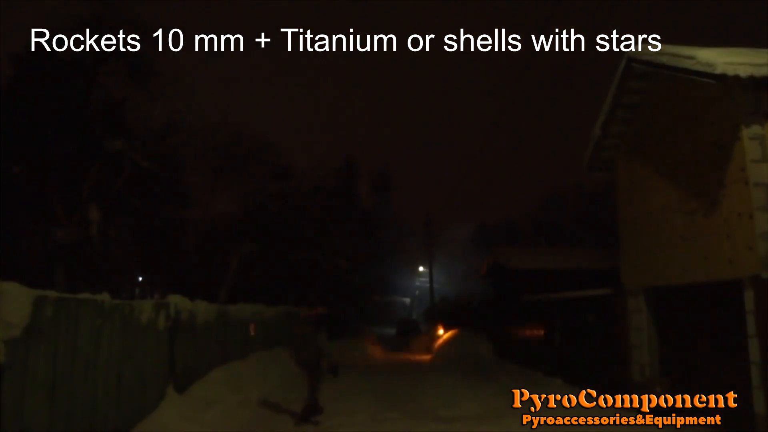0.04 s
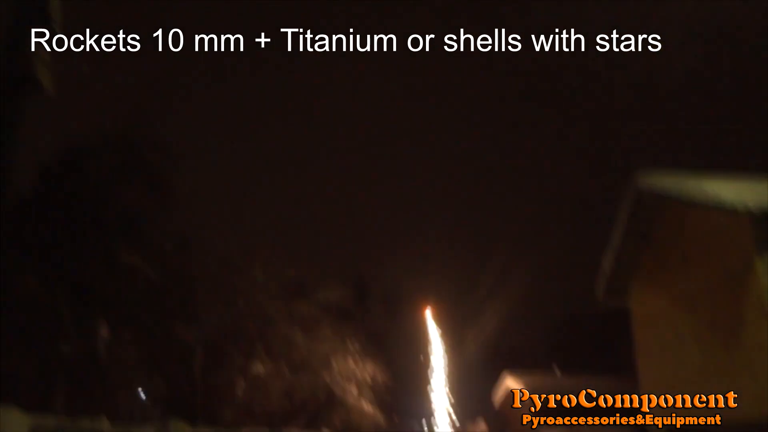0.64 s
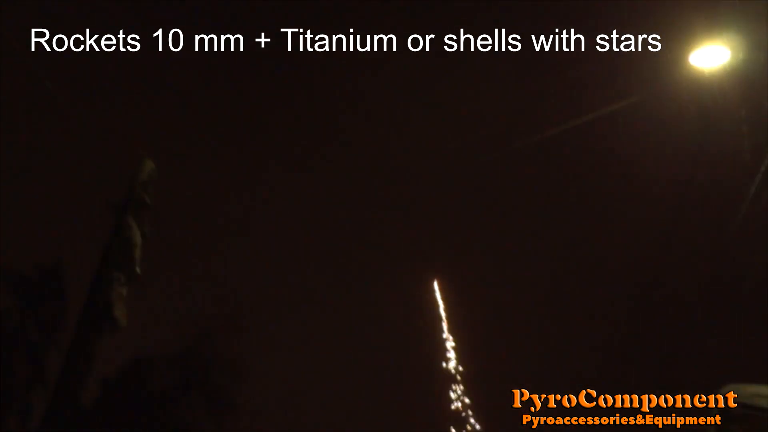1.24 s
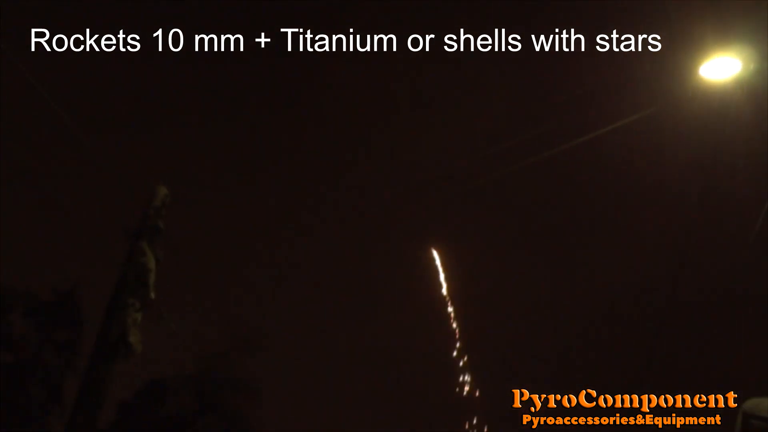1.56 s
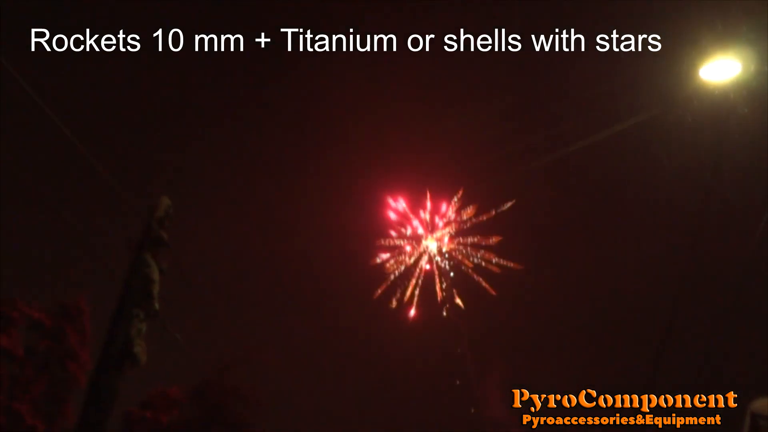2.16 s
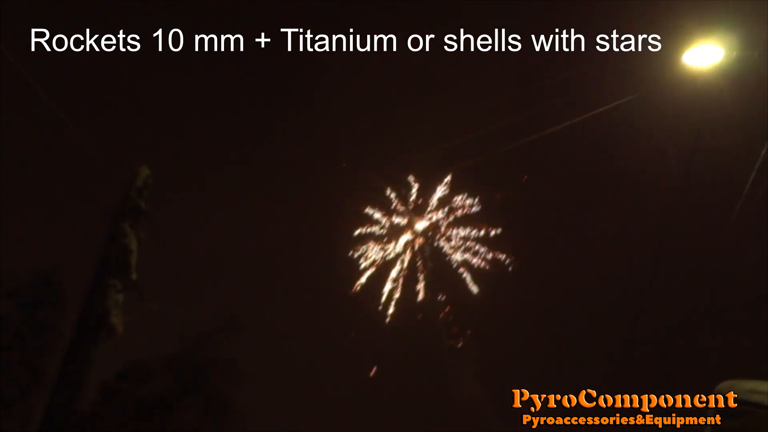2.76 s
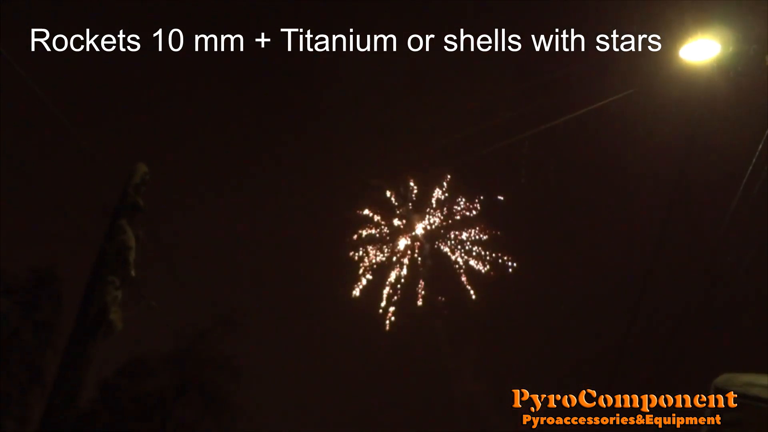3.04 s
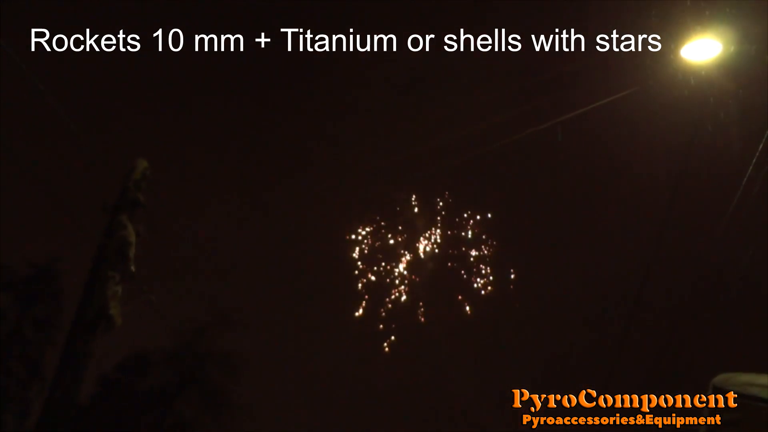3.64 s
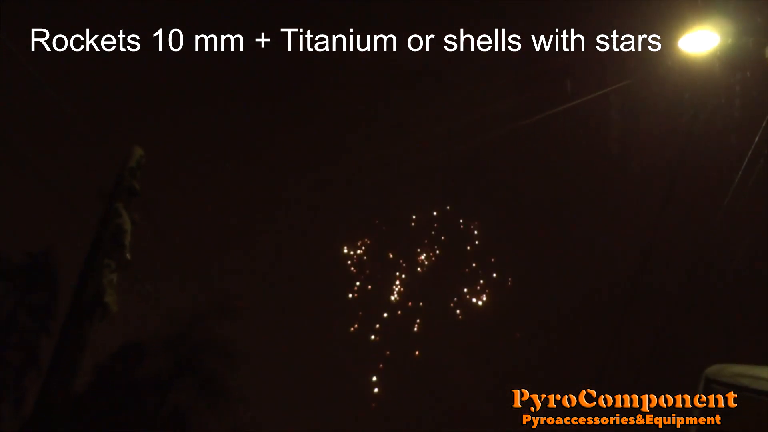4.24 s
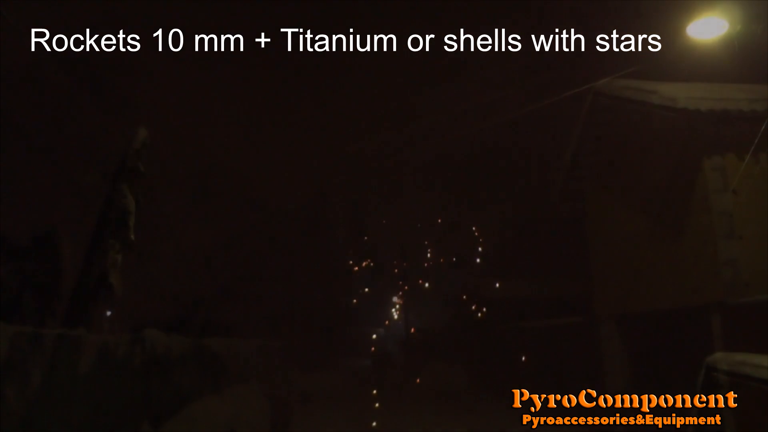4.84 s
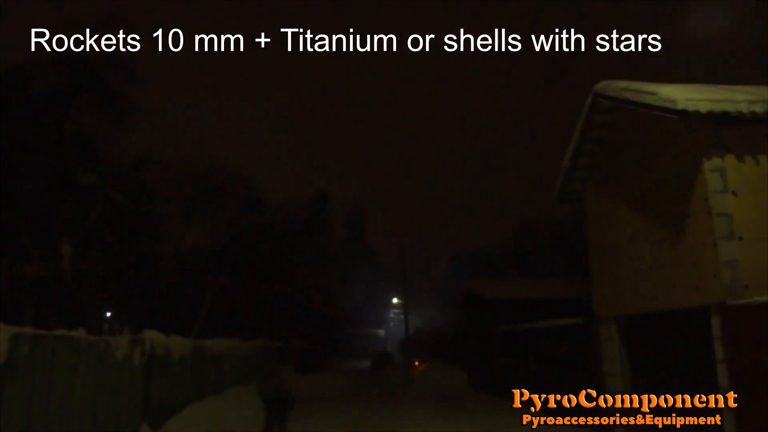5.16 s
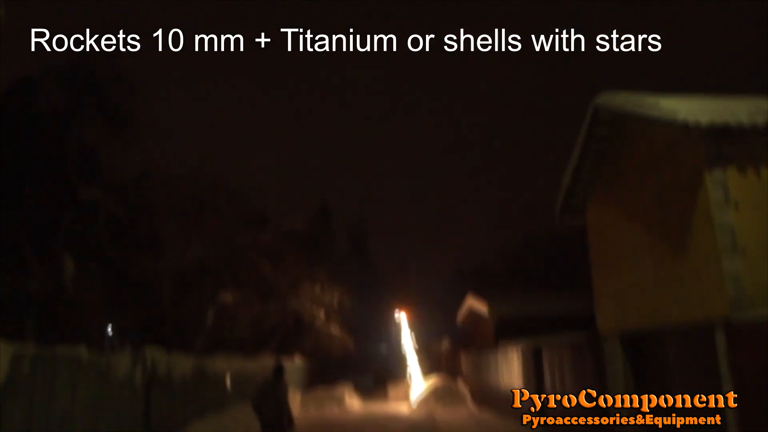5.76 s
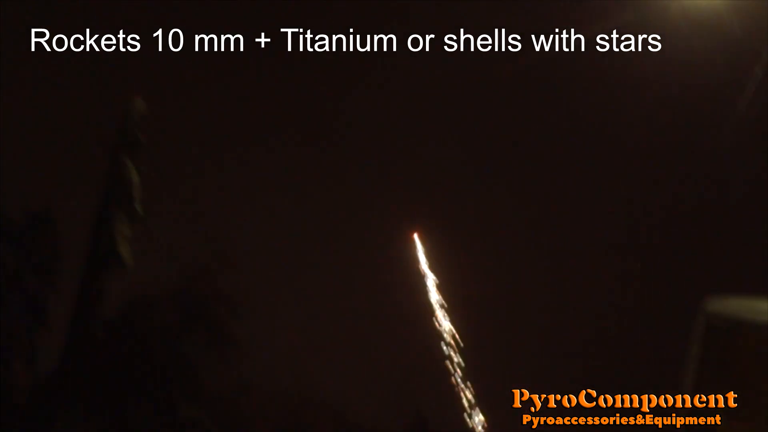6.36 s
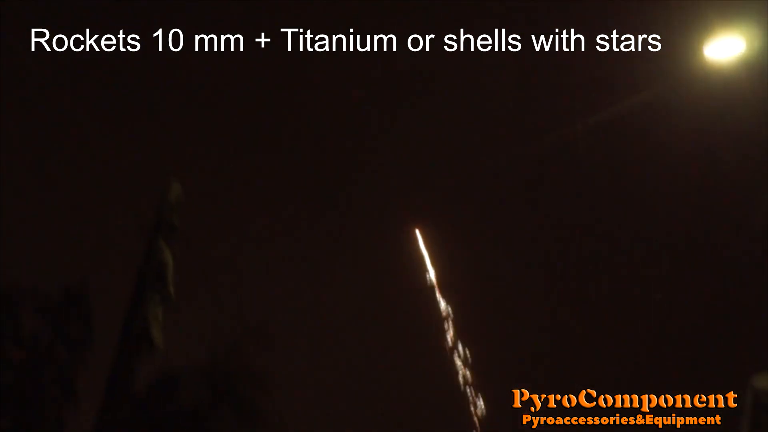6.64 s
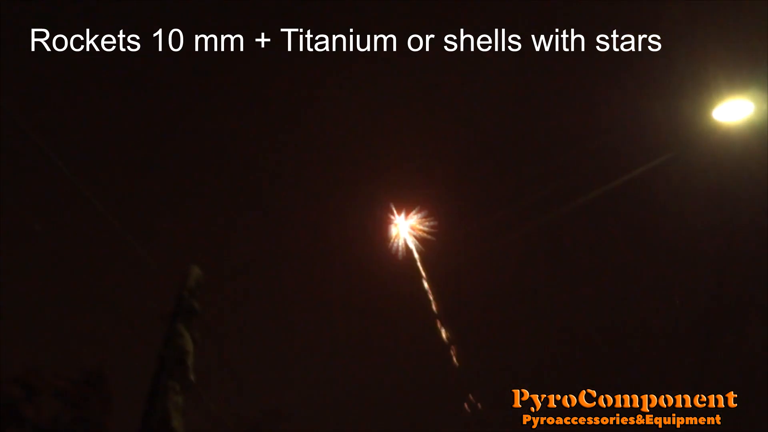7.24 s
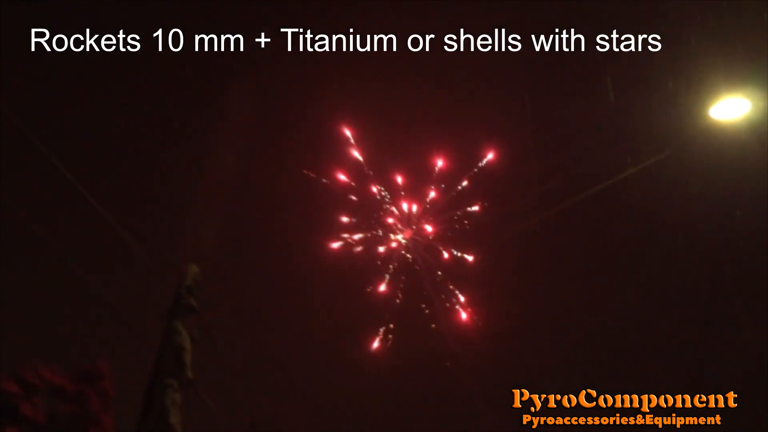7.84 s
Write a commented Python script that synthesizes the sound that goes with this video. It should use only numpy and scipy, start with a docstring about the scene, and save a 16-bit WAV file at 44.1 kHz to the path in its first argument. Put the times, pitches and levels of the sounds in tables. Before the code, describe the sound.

A firework rocket launches right at the start with a thump and a brief fizz. A rush of gas follows, with a whistle that begins ragged, slides down in pitch, grows purer and lifts slightly before ending at 1.2 seconds, leaving distant echoes. At 2 seconds it bursts with a loud, rolling boom. Sharp, irregular cracks follow from 2.5 to 3.7 seconds, then faint ticks close to the microphone around 4. A few more cracks lead to a duller, long-echoing boom at 4.5. A second fuse fizzes, and at 5.4 another thump sends up a second hissing, falling whistle, ending with a smaller bang at 6.5. This rocket bursts loudly at about 7.4 seconds, with two cracks just before 8. The fireworks sound from ahead, outdoors on a street, echoing off houses and trees over the very soft hush of night air.

```python
"""Two whistling rockets go up, one after the other, and burst over a snowy street at night.
Each lights with a fizzing fuse, a thump and a rush of gas. Its whistle slides down in pitch as the
tube burns hollow. Booms and the sharp cracks of stars (firework pellets) follow; faint ticks and
rustles sound close to the microphone. The ground, the houses and far trees throw the fireworks'
sound back, over the soft hush of still air."""
import sys
import numpy as np
from scipy import signal
from scipy.fft import rfft, irfft, next_fast_len
from scipy.io import wavfile

SR = 44100
rng = np.random.default_rng(int(sys.argv[2]) if len(sys.argv) > 2 else 0)


def generate_wav(sig):
    """Save sig (samples, or channels by samples) to the path in sys.argv[1] as 16-bit PCM at SR."""
    pcm = np.round(np.clip(np.atleast_2d(sig).T, -1, 1) * 32767).astype(np.int16)
    wavfile.write(sys.argv[1], SR, pcm)


N = 357210

# The two rockets: ignition_s, lift_off_s, flare_db, jet_db, whistle_db, roar_fade_db_per_s, attack_s
LAUNCHES = [(.05, 0.269, -34.5, -25, 0.14, 12.5, .04), (5.429, 5.56, -32, -25, 0.03, 38.5, .004)]
# Each tube's lowest note, from full thrust to burn-out: time_s, pitch_hz
FIRST_PITCH = [(.172, 2452), (.235, 2266), (.29, 2452), (.345, 2360), (.5, 1873), (.63, 1579), (.75, 1412),
               (.875, 1336), (.965, 1399), (1.07, 1355), (1.135, 1423), (1.18, 1540)]
SECOND_PITCH = [(5.51, 2520), (5.56, 2489), (5.64, 2332), (5.8, 1873), (5.96, 1535), (6.16, 1322),
                (6.24, 1320), (6.29, 1361), (6.46, 1399), (6.5, 1493)]
# Whistle tones that follow LOW_SWELL (odd) and HIGH_SWELL (even): pitch_multiple, offset_db
ODD_TONES = [(1, 0.5), (3, 0.5), (5, -12.5), (7, -11.5), (9, -22)]
HIGH_EVEN_TONES = [(6, -15.5), (8, -18), (10, -32)]
# The hiss and the roar of the gas jet, and the fizz of the fuse: frequency_hz, level_db
HISS_COLOUR = [(1200, -37.5), (2300, -4), (3200, 7), (4500, 8.5), (6000, 7.5), (7500, -2), (10000, -2),
               (13000, -10.5), (16000, -21)]
ROAR_COLOUR = [(100, -57.5), (350, -25.5), (650, -10.5), (1100, -1.5), (1800, -1.5), (2600, -4),
               (5000, -14.5), (12000, -43.5)]
FUSE_COLOUR = [(800, -9), (2000, -8.5), (2500, -13.5), (3300, -4), (4200, 2), (5000, -6), (6000, -2),
               (7500, -8.5), (10000, -14.5), (14000, -26.5), (16000, -31)]
# Notes at which the hollow tube rings: pitch_multiple, width_hz, level_db
TUBE_RINGS = [(.48, 111, -12.5), (0.669, 150, -9), (.97, 240.2, 3), (1.269, 258.2, 0), (2.021, 377.5, 4.5),
              (2.6, 497, -7), (3.07, 496, -3.5), (4, 501, -7)]
# Powder blasts on the ground and in the sky: start_s, level_db, body_hz, treble_db_per_octave,
# bounce_delay_s, echo_db, echo_swell_s, echo_length_s, midrange_bark_db, wall_slap_db
BLASTS = [ (0.0425, 3, 361, -1, 0.021, 20, 0.027, 0.18, 0.5, -6),
          (2.0225, 2, 417, 0.5, 0.0084, 21, 0.078, 1.55, -3, -2),
          (2.82, -11.5, 319, -1, 0.0073, 21, 0.063, 1.3, 0, -3),
          (4.5405, 1.5, 380, -6.5, 0.023, 19, 0.015, 2.3, 3.5, -8),
          (5.4284, 4, 320, 2.5, 0.019, 19.5, 0.024, 0.093, 0, -6),
          (6.546, -9.5, 352, -3, 0.025, 13.5, 0.0066, 0.53, 4, -3.5),
          (7.323, -11.5, 355.6, -4.5, 0.021, 18.5, 0.022, 0.31, 2, -6.5),
          (7.3741, 2.5, 425.4, 1.5, 0.0067, 20, 0.053, 2.4, -1.5, 1.5)]
# The tone of a blast: multiple_of_body_hz, level_db
BLAST_COLOUR = [(.07, -43), (.17, -29), (.31, -18.5), (.52, -2.5), (.8, 3), (1, 2), (1.3, 1), (1.8, -2),
                (2.6, -7), (5.2, -12), (9.5, -19.5), (17, -30.5), (26, -34.5), (38, -40)]
# Cracking stars: start_s, level_db, treble_db_per_octave, echo_db
STAR_CRACKS = [ (2.0676, -7.5, 11.5, 5.5), (2.4585, -7.5, 0.5, -11), (2.5376, -15.5, 5, -8),
               (2.6397, 0.5, 1, -1.5), (2.7088, -4, 3, -11), (2.8254, 1.5, -1, 1.5), (2.8977, 3, -2, 3.5),
               (3.3955, 0.5, -2.5, 2), (3.4393, 3.5, -3.5, 1.5), (3.4881, -3, -4.5, 6),
               (3.5474, 1.5, 1.5, -2), (3.6867, -17.5, -10, -12.5), (4.2939, -3.5, -2, 8.5),
               (4.3051, -6, -0.5, 9), (4.4333, -6.5, -2, 4.5), (7.7462, -12, 0, -16), (7.8638, -1.5, 2, -5)]
# Thin, high ticks: start_s, level_db, rustle_db, rustle_length_s
TICKS = [(3.9, -22, -55.5, .11), (3.909, -19, -62, .02), (3.995, -23, -58, 0.023), (4.138, -26, -56, 0.04),
         (4.578, -42, -57, .05), (5.217, -25.5, -66.5, .01)]
# The tone of a crack and of a tick: frequency_hz, level_db
CRACK_COLOUR = [(30, -41.5), (100, -27), (250, -6), (600, 2), (1200, 2.5), (2500, 1.5), (4200, -3),
                (7000, -15), (11000, -21.5), (16000, -40.5)]
TICK_COLOUR = [(1000, -32), (3500, -3), (7000, -6.5), (11500, 1), (15000, -1.5)]
# House fronts that slap a blast back: delay_s, level_db
HOUSE_FRONTS = [(0.044, -11.5), (0.079, -16.5), (.101, -16.5), (0.118, -17), (0.167, -17.5), (.176, -16),
                (.248, -22), (.318, -26), (.538, -36)]
# Whistle echoes off far walls and trees. The rocket moves away from them more slowly, so they hear
# a higher pitch (the Doppler effect): delay_s, level_db, pitch_factor, smear_s
FAR_ECHOES = [(0.149, -17, 1.055, .2), (.29, -22.5, 1.04, 0.22), (0.429, -27.5, 1.04, .16),
              (.71, -30.5, 1.02, .06), (.86, -46, 1.03, .2)]
# How long the street's echo takes to fall by 60 dB: frequency_hz, decay_s
STREET_DECAY = [(100, 3), (300, 1.5), (700, 2.5), (1500, 1.59), (3000, 1.3043), (5000, 0.84), (8000, 0.81),
                (15000, 0.5553)]
# The tone left by the walls, by a trip along the street and by a long way in air: frequency_hz, gain_db
WALL_COLOUR = [(100, -9), (400, -1), (1500, -0.5), (3500, 0), (7000, 1.5), (15000, 6.5)]
WASH_COLOUR = [(1400, -1), (3000, 3.5), (5500, 0.5), (11000, -5)]
FAR_COLOUR = [(1400, -2.5), (3000, -1.5), (4200, -15), (5600, -37), (10000, -55.5)]
# Still night air: frequency_hz, level_db
AIR_COLOUR = [(25, -8), (90, -17), (250, 1.5), (600, -3.5), (1500, -23), (4000, -33), (9000, -29),
              (13500, -28), (15000, -45)]
# How much the two microphones differ, against what they share: frequency_hz, gain_db
STEREO_WIDTH = [(60, -32), (150, -25), (500, -14.5), (1000, -6), (2500, -7), (5000, -7.5), (12000, -10.5)]
# How the sound leans to one side: frequency_hz, left_minus_right_db
STEREO_LEAN = [(130, 0), (640, -1), (1400, -2), (3100, -0.2), (7000, 0)]

# Whistle tones swell and fade in the climb: peak_db, peak_after_lift_s, rise_db_per_s, fade_db_per_s
LOW_SWELL, MAIN_SWELL, OCTAVE_SWELL = (-22, 0.53, 51, 89), (-14, 0.68, 11, 13), (-22, 0.6, 24.5, 55.5)
HIGH_SWELL = (-22, 0.66, 42, 100)  # these come out late, once the tube is long
WHISTLE_RELEASE_S = 0.028
JET_START_DB, JET_CATCH_DB, JET_CATCH_S = -25, -12, 0.01  # builds, then jumps as the whistle catches
JET_HOLD_S, JET_FADE_DB_PER_S, JET_RELEASE_S = 0.28, 43, 0.11  # holds steady at first, then fades
FUSE_S, SMOULDER_DB, SMOULDER_DB_PER_S = 0.72, -50, 27
FLARE_LEAD_S, FLARE_RISE_S, FLARE_RELEASE_S = 0.16, 0.028, 0.03


def rockets(wash_db=-17, fence_db=-12, fence_decay_s=0.016):
    """Fuse, jet and whistle, blurred by near fences, washed along the street and echoed from afar."""
    direct, far = np.zeros(N), np.zeros(N)
    for pitch, launch in zip((FIRST_PITCH, SECOND_PITCH), LAUNCHES):
        ignition_s, lift_s, flare_db, jet_db, whistle_db, roar_fade_db_per_s, attack_s = launch
        add(direct, *fuse(pitch[0][0], flare_db))
        add(direct, *jet(pitch, ignition_s, lift_s, jet_db, roar_fade_db_per_s))
        add(direct, *whistle(pitch, lift_s, whistle_db, attack_s))
        add_far_echoes(far, pitch, lift_s, whistle_db, attack_s)
    fences = rng.standard_normal(SR // 4) * np.exp(-np.arange(SR // 4) / SR / fence_decay_s)
    near = amp(fence_db) * signal.fftconvolve(direct, unit_energy(fences))[:N]
    street = street_echo(swell_s=0.02, lumpy_db=4.5, early_db=-6.5, early_s=0.37)
    wash = amp(wash_db) * signal.fftconvolve(direct, street)[:N]
    return direct + near + coloured(wash, WASH_COLOUR) + coloured(far, FAR_COLOUR)


def whistle(pitch, lift_s, level_db, attack_s, doppler=1, wobble=0.003, flicker_db=1.7, flutter_db=1.3):
    """Gas vibrates in the burning tube: ragged while it is short and high, pure once it is long."""
    t, hz = pitch_curve(pitch)
    swells = (LOW_SWELL, MAIN_SWELL, OCTAVE_SWELL, HIGH_SWELL)
    low_db, main_db, octave_db, high_db = (swell(t - lift_s, *shape) for shape in swells)
    ragged = np.clip((hz - 1380) / 700, 0, 1.4)
    fast_jitter = (0.0045 + 0.01602 * ragged) * wander(len(t), 400)
    slow_jitter = wobble * (1 + 2 * ragged) * wander(len(t), 45)
    phase = 2 * np.pi * np.cumsum(doppler * hz * (1 + fast_jitter + slow_jitter)) / SR
    tones = [(2, main_db), (4, octave_db)]
    tones += [(k, high_db + db) for k, db in HIGH_EVEN_TONES]
    tones += [(k, low_db + db) for k, db in ODD_TONES]
    # The higher tones shake more, in level and in phase.
    tones = [(k, db + flicker_db * np.log2(max(k / 2, 1)) * wander(len(t), 30)) for k, db in tones]
    sound = np.zeros(len(t))
    for k, db in tones:
        shake = 0.067 * (1 + ragged) * wander(len(t), 140)
        sound += amp(db) * np.sin(k * (phase + shake)) * (k * hz < SR / 2)
    flutter = amp(flutter_db * wander(len(t), 110))
    fades = np.minimum((t - t[0]) / attack_s, 1) * np.minimum((t[-1] - t) / WHISTLE_RELEASE_S, 1)
    return t[0], ground_bounce(t, np.sqrt(2) * amp(level_db) * sound * flutter * fades, share=0.14)


def jet(pitch, ignition_s, lift_s, jet_db, roar_fade_db_per_s, hiss_db=3, roar_db=-1.5, tube_db=-6.5):
    """Sputtering gas hisses, roars and rings the tube; the roar and ring fade first as it climbs."""
    thrust_s, burnout_s = pitch[0][0], pitch[-1][0]
    t = np.arange(ignition_s, burnout_s, 1 / SR)
    hz = np.interp(t, *np.transpose(pitch))
    climb_s = np.maximum(t - lift_s - JET_HOLD_S, 0)
    build_db = np.interp(t, [ignition_s, thrust_s - JET_CATCH_S, thrust_s],
                         [JET_START_DB, JET_CATCH_DB, 0])
    level = amp(jet_db + build_db - JET_FADE_DB_PER_S * climb_s)
    hiss = amp(hiss_db) * noise(len(t), HISS_COLOUR)
    roar = amp(roar_db) * noise(len(t), ROAR_COLOUR)
    ring = sum(amp(tube_db + db) * ringing_noise(k * hz, width_hz) for k, width_hz, db in TUBE_RINGS)
    gas = level * (hiss + amp(-roar_fade_db_per_s * climb_s) * (roar + ring))
    sputter = amp(wander(len(t), 80))
    fade_out = np.minimum((burnout_s - t) / JET_RELEASE_S, 1)
    return t[0], ground_bounce(t, gas * sputter * fade_out, share=0.5)


def fuse(thrust_s, flare_db, bounce_share=0.24, bounce_s=0.007):
    """The fuse smoulders ever louder, then the starter powder flares; the ground reflects the fizz."""
    t = np.arange(max(thrust_s - FUSE_S, 0), thrust_s + FLARE_RELEASE_S, 1 / SR)
    wait_s = thrust_s - t
    smoulder = amp(SMOULDER_DB - SMOULDER_DB_PER_S * wait_s)
    flare = amp(flare_db) / (1 + np.exp((wait_s - FLARE_LEAD_S) / FLARE_RISE_S))
    level = (smoulder + flare) * np.minimum((t[-1] - t) / FLARE_RELEASE_S, 1)
    fizz = noise(len(t), FUSE_COLOUR) * level * amp(0.94 * wander(len(t), 150))
    return t[0], fizz + bounce_share * np.interp(t - bounce_s, t, fizz)


def blasts(dull_db_per_octave=-5, bark_hz=1400, bounce_db=4, echo_trim_db=-4):
    """Each blast thumps, bounces off the ground, slaps off house fronts and rolls along the street."""
    out = np.zeros(N)
    for start_s, db, body_hz, tilt, bounce_s, echo_db, swell_s, length_s, bark_db, slap_db in BLASTS:
        colour = [(k * body_hz, level_db + bark_db / (1 + np.log2(k * body_hz / bark_hz) ** 4))
                  for k, level_db in BLAST_COLOUR]
        thump = amp(db) * pressure_pulse(colour, tilt + dull_db_per_octave)
        echo = street_echo(swell_s, lumpy_db=4, early_db=-9, early_s=0.26)
        for delay_s, wall_db in HOUSE_FRONTS:
            add(echo, delay_s, amp([wall_db + slap_db]))
        roll = signal.fftconvolve(fade_after(echo, length_s), pressure_pulse(colour, tilt))
        add(out, start_s, thump)
        add(out, start_s + bounce_s, amp(bounce_db) * thump)
        add(out, start_s, amp(db + echo_db + echo_trim_db) * roll)
    return out


def star_cracks(bounce_s=0.0074, bounce_db=-9.5):
    """Each star gives one sharp snap; the ground repeats it and the houses scatter it."""
    out = np.zeros(N)
    for start_s, db, tilt, echo_db in STAR_CRACKS:
        snap = -amp(db) * pressure_pulse(CRACK_COLOUR, tilt)
        echo = street_echo(swell_s=0.00043, lumpy_db=6, early_db=-4.5, early_s=0.18)
        add(out, start_s, snap)
        add(out, start_s + bounce_s, amp(bounce_db) * snap)
        add(out, start_s, amp(echo_db) * signal.fftconvolve(echo, snap))
    return out


def ticks():
    """Faint dry ticks close to the microphone, each followed by a thin rustle."""
    out, tick = np.zeros(N), pressure_pulse(TICK_COLOUR, 0)
    for start_s, db, rustle_db, length_s in TICKS:
        rustle = amp(rustle_db) * fade_after(rng.standard_normal(SR // 4), length_s)
        add(out, start_s, amp(db) * tick)
        add(out, start_s, signal.fftconvolve(rustle, tick))
    return out


def ground_bounce(t, sound, share, first_lag_s=0.000647, extra_lag_s=0.0037, climb_s=0.94):
    """The ground's reflection comes ever later as the rocket climbs, sweeping dips through the tone."""
    climbed = np.clip(1 - (t[-1] - t) / climb_s, 0, 1)
    lag_s = first_lag_s + extra_lag_s * climbed ** 2
    return sound + share * np.interp(t - lag_s, t, sound)


def add_far_echoes(mix, pitch, lift_s, whistle_db, attack_s, rooftop_s=0.56, fade_s=0.22):
    """Far walls and trees return a smeared whistle, in full only once the rocket is above the roofs."""
    for delay_s, db, doppler, smear_s in FAR_ECHOES:
        start_s, sound = whistle(pitch, lift_s, whistle_db, attack_s, doppler, wobble=0.08 * smear_s)
        t = start_s + np.arange(len(sound)) / SR
        fade_in = np.clip((t - lift_s) / rooftop_s, 0, 1) ** 2
        fade_out = np.minimum((t[-1] - t) / fade_s, 1)
        size = round(smear_s * SR)
        smear = unit_energy(rng.standard_normal(SR)[:size] * np.hanning(size))
        echo = amp(db) * signal.fftconvolve(sound * fade_in * fade_out, smear)
        add(mix, start_s + delay_s - smear_s / 2, echo)


def street_echo(swell_s, lumpy_db, early_db, early_s):
    """The street's answer to a click: strong echoes off near houses, then a roll that loses treble."""
    t = np.arange(2 * SR) / SR
    sizes = amp(lumpy_db * np.clip(rng.standard_normal(len(t)), -2, 2))
    signs = rng.choice([-1, 1], len(t))
    arrives = rng.random(len(t)) < 3000 / SR  # about 3000 echoes a second
    hz, age_s, spectrum = signal.stft(sizes * signs * arrives, SR, nperseg=256)
    decay_db = 60 * age_s / look_up(STREET_DECAY, hz)[:, None]
    spectrum *= amp(look_up(WALL_COLOUR, hz)[:, None] - decay_db)
    roll = signal.istft(spectrum, SR, nperseg=256)[1][:len(t)]
    early_boost = 1 + amp(early_db) * np.exp(-(t / early_s) ** 2)
    return unit_energy(roll * (1 - np.exp(-t / swell_s)) * early_boost)


def night_air(level_db=-63):
    """The low, steady hush of still air."""
    return amp(level_db) * noise(N, AIR_COLOUR)


def pressure_pulse(colour, treble_db_per_octave, size=4096):
    """A sudden push of air with the given tone, made brighter or duller above about 700 Hz."""
    hz = abs(np.fft.fftfreq(size, 1 / SR))
    log_gain = np.log(amp(look_up(colour, hz) + treble_db_per_octave * np.log2(1 + hz / 700)))
    spectrum = np.exp(np.conj(signal.hilbert(log_gain)))  # packs the energy at the pulse's start
    return unit_energy(np.fft.ifft(spectrum).real[:size // 2])


def ringing_noise(hz, width_hz):
    """A narrow band of noise that follows a moving pitch."""
    turn = np.exp(2j * np.pi * np.cumsum(hz) / SR)
    decay = np.exp(-np.pi * width_hz / SR)
    hiss = rng.standard_normal(len(hz))
    band = signal.lfilter([(1 - decay) ** 2], [1, -2 * decay, decay ** 2], hiss / turn)
    return unit_level((turn * band).real)


def pitch_curve(points):
    """Joins pitch points with straight lines, giving a time and a pitch for every sample."""
    times_s, hz = np.transpose(points)
    t = np.arange(times_s[0], times_s[-1], 1 / SR)
    return t, np.interp(t, times_s, hz)


def swell(age_s, peak_db, peak_s, rise_db_per_s, fade_db_per_s):
    """A level in dB that climbs to its peak and falls again."""
    before_s, after_s = np.maximum(peak_s - age_s, 0), np.maximum(age_s - peak_s, 0)
    return peak_db - rise_db_per_s * before_s - fade_db_per_s * after_s


def fade_after(sound, length_s):
    """Lets a sound die away quickly around length_s."""
    return sound / (1 + (np.arange(len(sound)) / SR / length_s) ** 10)


def wander(size, hz):
    """Random drift of typical size 1, mostly slower than hz."""
    smoothing = signal.butter(2, hz, fs=SR, output="sos")
    return unit_level(signal.sosfilt(smoothing, rng.standard_normal(size + 4096))[4096:])


def noise(size, colour):
    """Noise of level 1 with the given tone."""
    return unit_level(coloured(rng.standard_normal(size), colour))


def coloured(sound, colour):
    """Turns each frequency up or down by a table of decibels."""
    size = next_fast_len(len(sound))
    gain = amp(look_up(colour, np.fft.rfftfreq(size, 1 / SR)))
    return irfft(rfft(sound, size) * gain, size)[:len(sound)]


def look_up(table, hz):
    """Reads between a table's rows, with octaves evenly spaced."""
    row_hz, values = np.transpose(table)
    return np.interp(np.log(hz + 1), np.log(row_hz), values)


def add(mix, start_s, sound):
    """Mixes a sound in at a time."""
    part = mix[max(round(start_s * SR), 0):][:len(sound)]
    part += sound[:len(part)]


def amp(db):
    """Turns decibels into a gain."""
    return 10 ** (np.asarray(db) / 20)


def unit_level(x):
    """Scales to an average (rms) level of 1."""
    return x / np.sqrt(np.mean(x ** 2) + 1e-20)


def unit_energy(x):
    """Scales so that the squared samples add up to 1."""
    return x / np.linalg.norm(x)


def scene(shifted_share=0.3, scattered_share=0.28):
    """All lies ahead of two close microphones that differ a little in phase, level and scatter."""
    mid = rockets() + blasts() + star_cracks() + ticks() + night_air()
    scatter = unit_energy(rng.standard_normal(2048) * np.exp(-np.arange(2048) / 500))
    scattered = signal.oaconvolve(mid, scatter)[:N]
    shifted = signal.hilbert(mid).imag  # every wave moved by a quarter of a cycle
    width = coloured(shifted_share * shifted + scattered_share * scattered, STEREO_WIDTH)
    side = width + (coloured(mid, STEREO_LEAN) - mid) / 2
    return np.array([mid + side, mid - side])


def record(dry, ceiling=0.77, low_cut_hz=60, high_cut_hz=15600):
    """Rounds off the loudest peaks, then trims the deepest bass and the highest treble."""
    rounded = dry / (1 + (dry / ceiling) ** 6) ** (1 / 6)
    thinned = signal.sosfilt(signal.butter(1, low_cut_hz, "high", fs=SR, output="sos"), rounded)
    high_cut = signal.firwin(511, high_cut_hz, window=("kaiser", 9), fs=SR)
    return signal.oaconvolve(thinned, high_cut[None], "same")


dry = scene()
out = record(dry)
generate_wav(out)
```